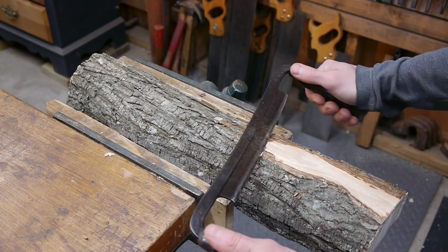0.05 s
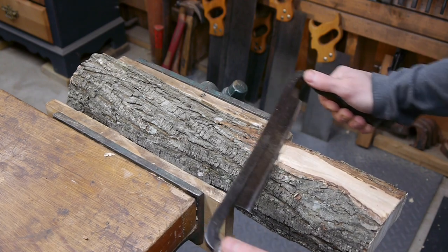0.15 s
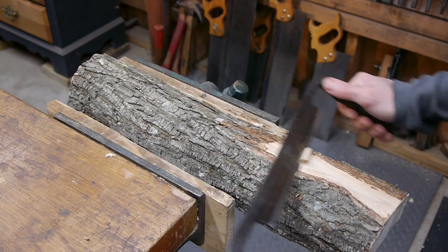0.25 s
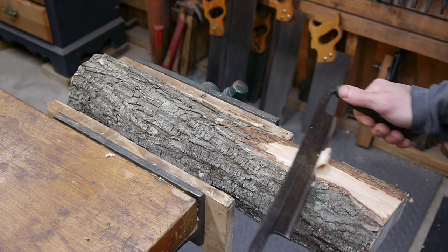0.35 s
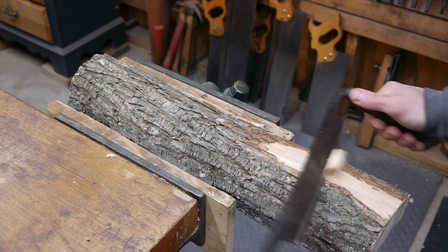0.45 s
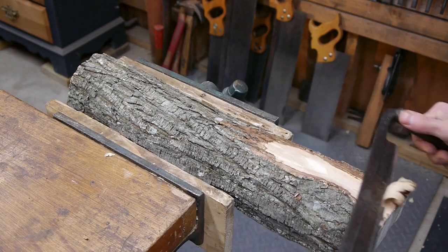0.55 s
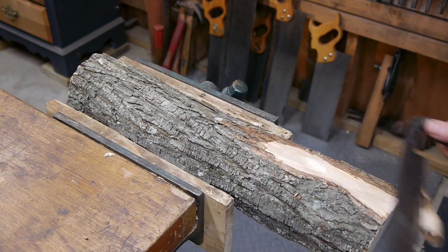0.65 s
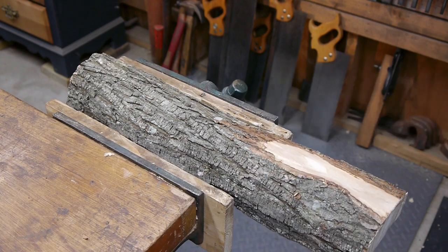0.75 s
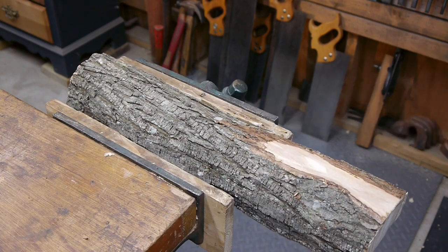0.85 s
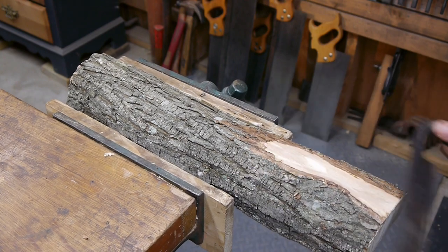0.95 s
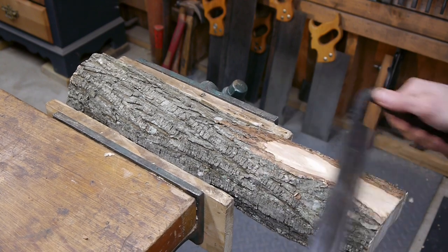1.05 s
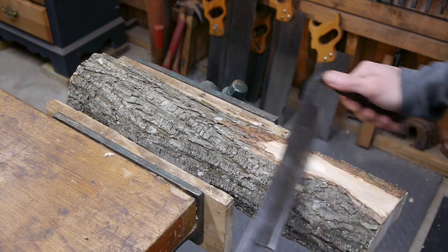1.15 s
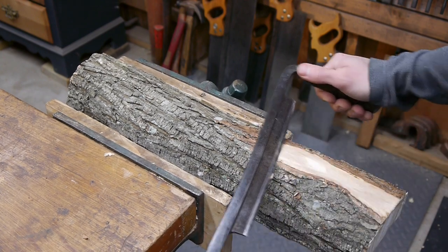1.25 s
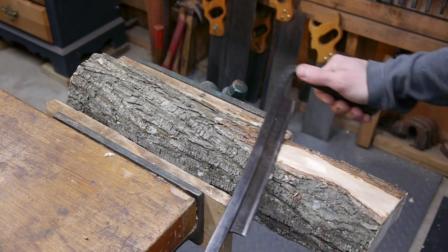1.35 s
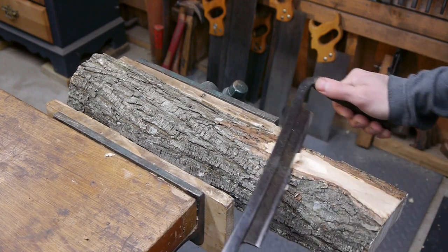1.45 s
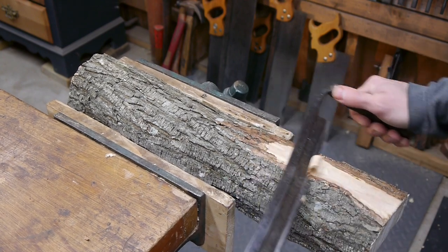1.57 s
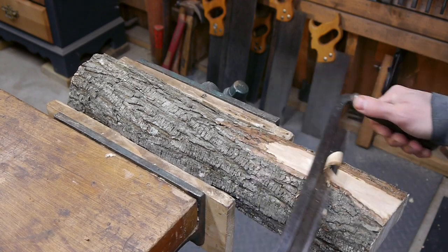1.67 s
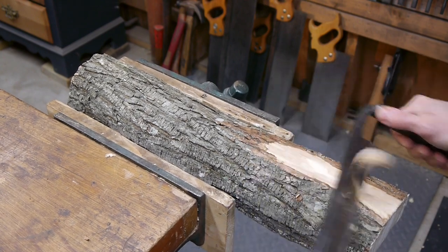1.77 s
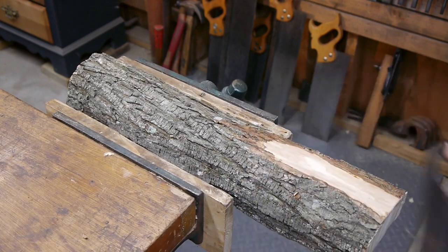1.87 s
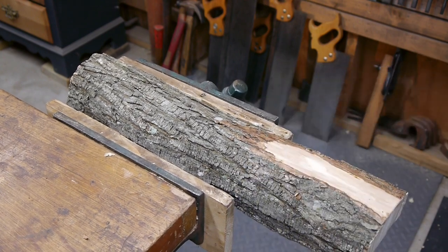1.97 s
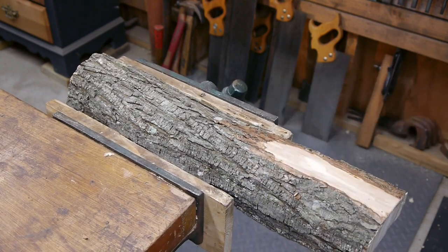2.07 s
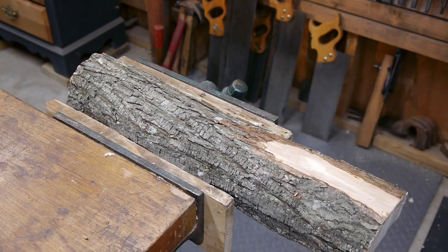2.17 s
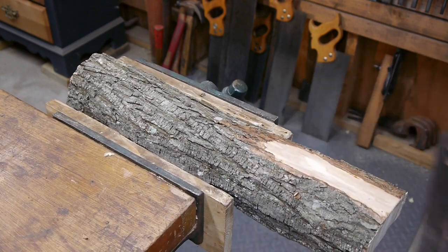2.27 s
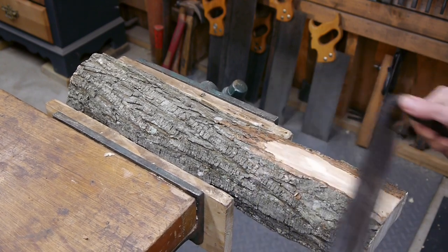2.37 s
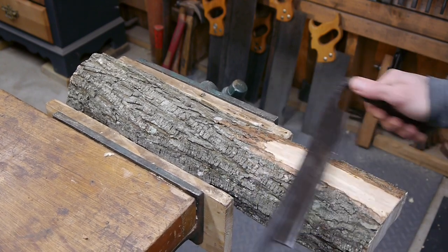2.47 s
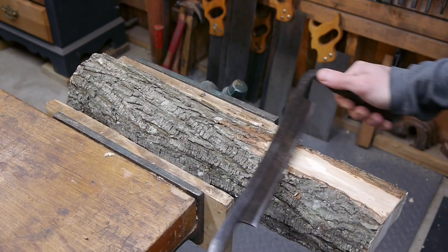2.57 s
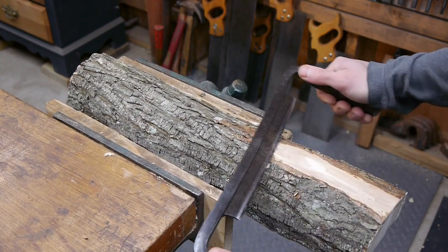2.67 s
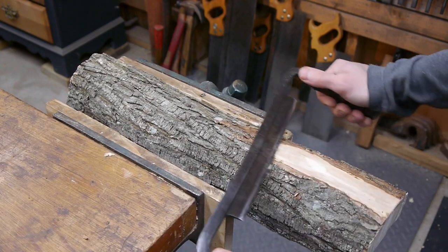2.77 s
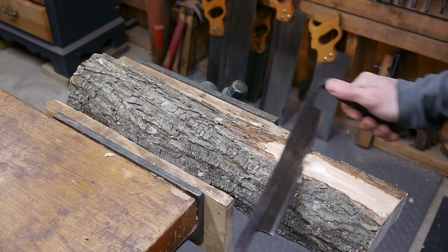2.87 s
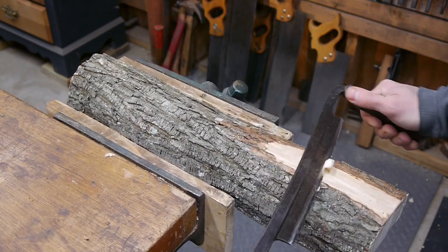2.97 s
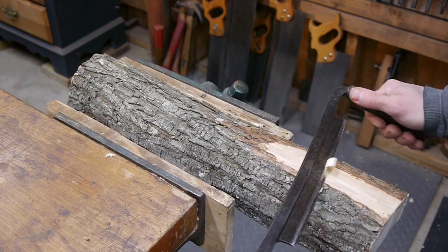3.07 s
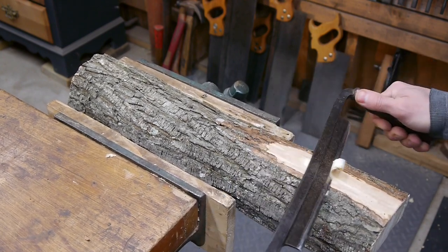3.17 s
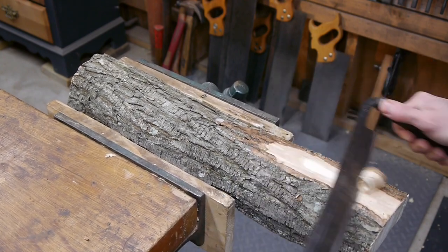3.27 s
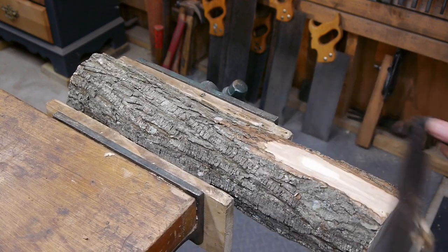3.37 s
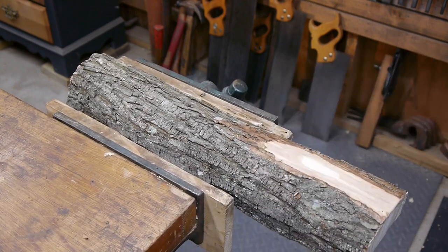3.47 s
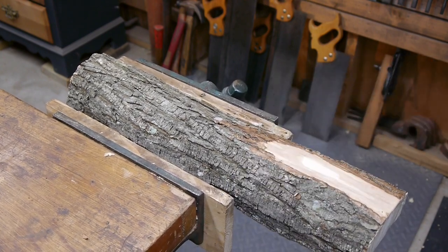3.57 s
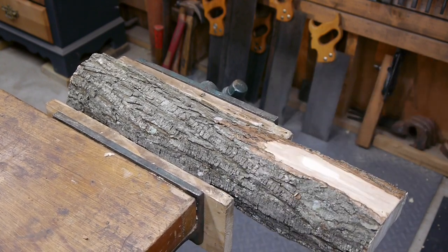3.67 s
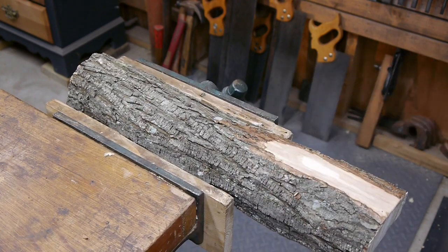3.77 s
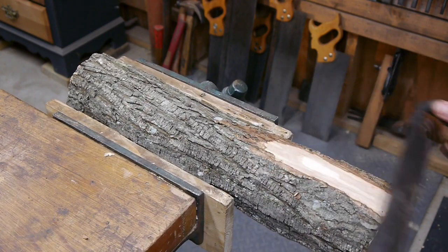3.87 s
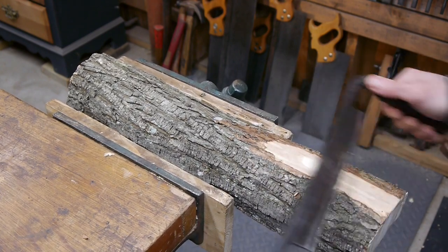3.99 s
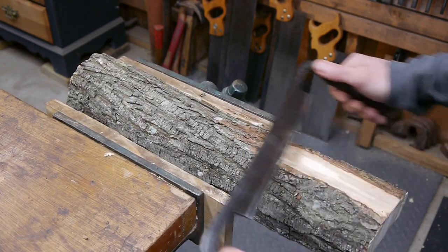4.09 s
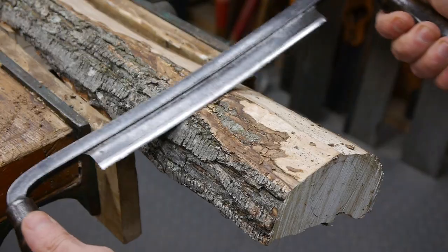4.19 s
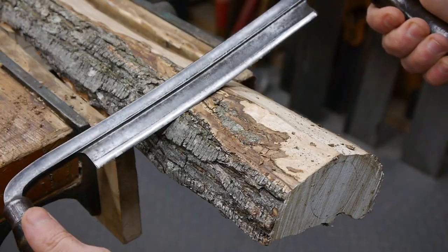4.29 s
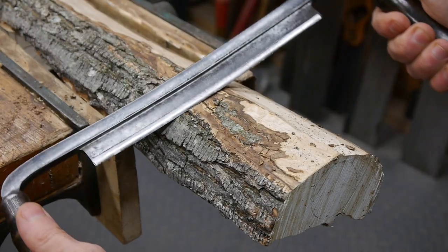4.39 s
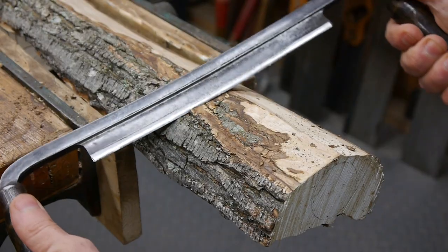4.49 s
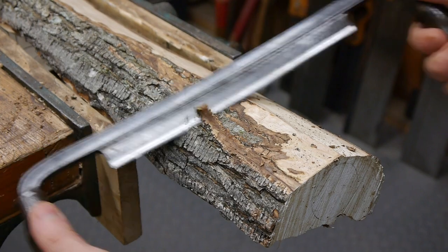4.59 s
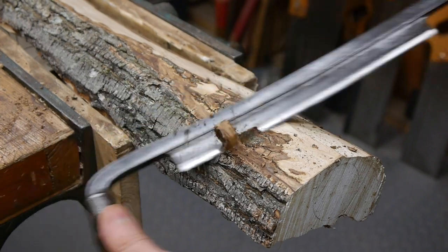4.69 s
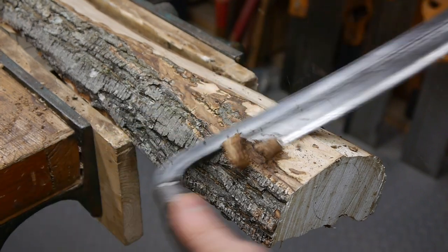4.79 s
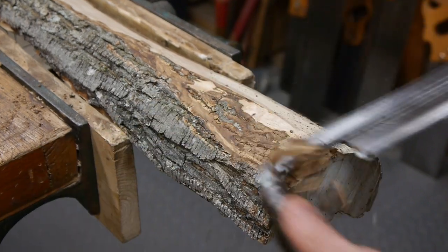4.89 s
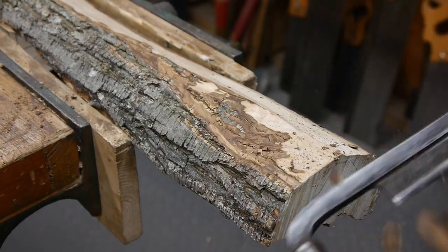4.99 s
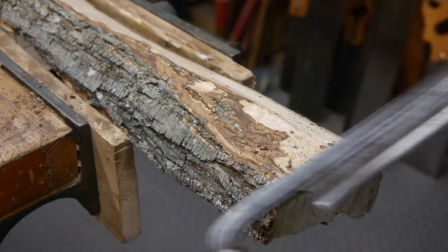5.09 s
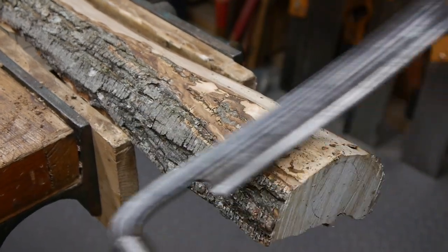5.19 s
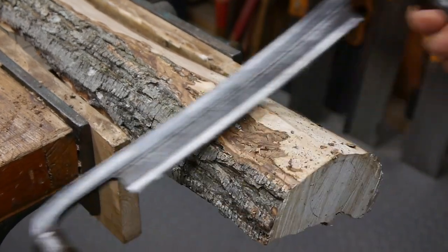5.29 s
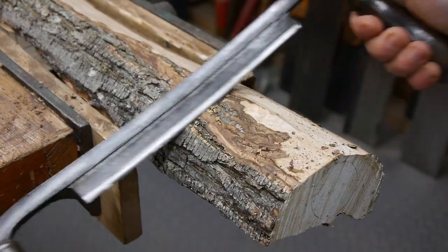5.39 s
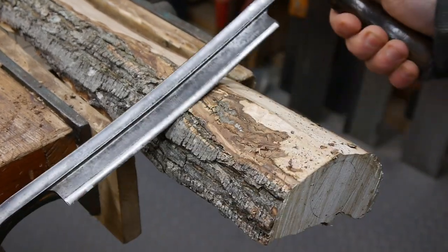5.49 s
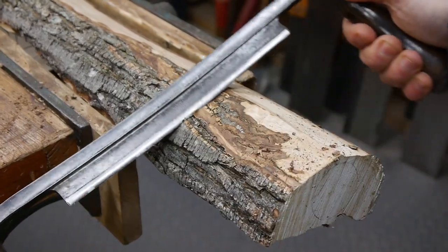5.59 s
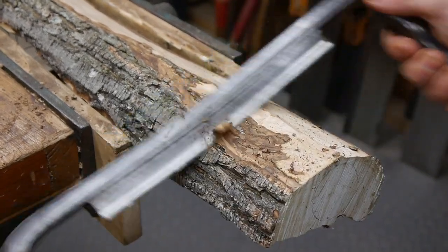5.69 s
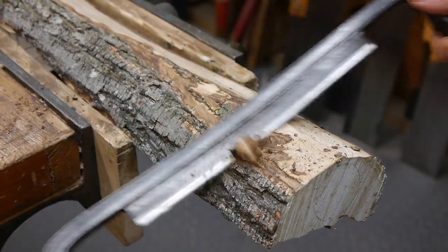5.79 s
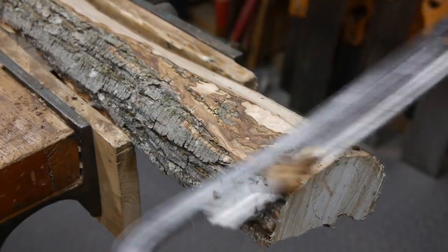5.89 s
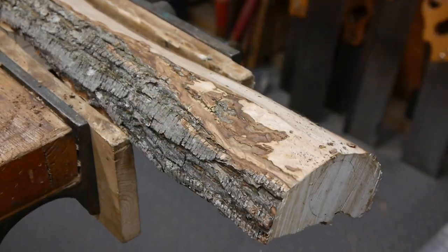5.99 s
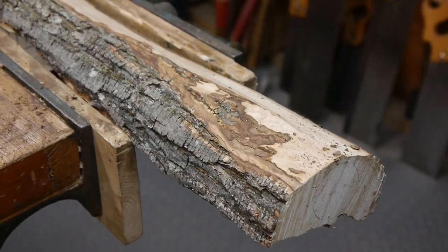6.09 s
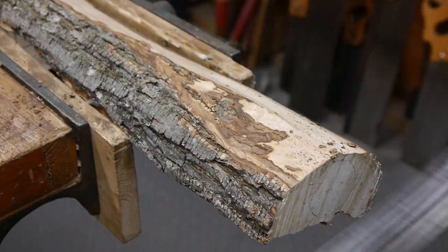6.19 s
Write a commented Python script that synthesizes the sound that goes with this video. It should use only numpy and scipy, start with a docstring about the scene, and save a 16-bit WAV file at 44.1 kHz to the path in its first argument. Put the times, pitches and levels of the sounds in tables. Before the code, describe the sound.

Close stereo sound in a small workshop with short reverberation and soft steady hiss. At 0.1 s a blade knocks hollowly on a log, and from 0.25 to 0.8 s it skims with a faint judder, then rasps, crackling and snapping, ending in a knock and ticking chips. A shaving lands at 1.2 s. A knock at 1.35 leads to a second scrape, 1.5-2.0, ending in a firm thud; shavings drop at 2.3. After bumps at 2.75 and 3.1, the third pull builds from 2.9 to 3.6 with chattering, crisp cracks and knocks. Another shaving falls at 3.85. A bright clack at 4.35 precedes a short, loud, tearing pull at 4.7-4.95, ending in a sharp crack, heavy knock and scattered chips. The blade slides back faintly at 5.2, knocks hardest at 5.5, then rips again from 5.7 to 6.0, rasping strongly and dying away with a knock and small ticks.

```python
"""Drawknife on a barked log

A drawknife peels bark from a log in a bench vice, in a small workshop: five pulls.
The last two pulls are in a second setup, with other log and blade resonances.
Knocks and clacks are ringing log modes and noise bursts; each pull skims, bites and runs out.
Random fibre breaks drive the cut through log and blade resonances; chatter, chips and snaps sit on top.
Shavings drop between pulls and soft brushing marks arm moves, all over a short room answer and steady hiss."""
import sys
import numpy as np
from scipy import signal
from scipy.fft import rfft, irfft, next_fast_len
from scipy.io import wavfile
from scipy.ndimage import uniform_filter1d, map_coordinates

SR = 44100
rng = np.random.default_rng(int(sys.argv[2]) if len(sys.argv) > 2 else 0)


def log_audio(samples):
    """Write samples as a 16-bit WAV file to the path given in sys.argv[1]."""
    # one column per channel
    frames = np.atleast_2d(samples).T
    # limit to full scale, then quantise
    limited = np.clip(frames, -1, 1)
    pcm = np.round(limited * 32767).astype(np.int16)
    wavfile.write(sys.argv[1], SR, pcm)


N = 275625


def amp(db):
    """Amplitude ratio of a level in dB."""
    return 10 ** (np.asarray(db) / 20)


def unit(x):
    """x scaled to rms 1."""
    return x / np.sqrt(np.mean(x ** 2) + 1e-20)


def along(points, hz):
    """Interpolate (Hz, value) points on a log frequency axis."""
    f, v = np.transpose(points)
    return np.interp(np.log(hz + 1), np.log(f + 1), v)


def wobble(rate_hz):
    """A smooth random curve, rate_hz knots a second."""
    knots = rng.standard_normal(int(N * rate_hz / SR) + 4)
    return map_coordinates(knots, [np.arange(N) * rate_hz / SR])


def coloured(x, gain):
    """x through the causal minimum-phase filter with this gain of frequency."""
    n = x.shape[-1]
    m = 2 * next_fast_len(n // 2 + 4096)
    log_gain = np.log(np.maximum(gain(np.fft.rfftfreq(m, 1 / SR)), 1e-6))
    cepstrum = irfft(log_gain, m)
    cepstrum[1:m // 2] *= 2  # fold onto positive time
    cepstrum[m // 2 + 1:] = 0
    return irfft(rfft(x, m) * np.exp(rfft(cepstrum)), m)[..., :n]


def shaped(x, spectrum):
    """x filtered by a (Hz, dB) spectrum, at rms 1."""
    return unit(coloured(x, lambda hz: amp(along(spectrum, hz))))


def add(track, s, sound, db):
    """Mix a sound into the track at a peak level."""
    part = track[round(s * SR):][:len(sound)]
    part += amp(db) * sound[:len(part)] / np.abs(sound).max()


def burst(t60_s):
    """A puff of tiny contacts: noise decaying 60 dB in t60_s."""
    t = np.arange(SR // 3) / SR
    return rng.standard_normal(len(t)) * amp(-60 * t / t60_s)


def fractures(rate_hz, spread_db):
    """Randomly timed breaks of uneven size and random sign, at rms 1."""
    size = amp(spread_db * np.clip(rng.standard_normal(N), -2, 2)) * rng.choice([-1, 1], N)
    return unit(size * (rng.random(N) < rate_hz / SR))


def swell(start_s, length_s, rise, fade, drift=0):
    """A gain that rises up to start_s, drifts for length_s, then fades; rates in dB per second."""
    t = np.arange(N) / SR - start_s
    rising_db = rise * np.minimum(t, 0)
    drift_db = drift * np.clip(t, 0, length_s)
    fading_db = fade * np.maximum(t - length_s, 0)
    return amp(rising_db + drift_db - fading_db)


def placed(x, wet_db):
    """Split a source into direct and reverberant shares of constant total power."""
    return np.array([x, amp(wet_db) * x]) / np.hypot(1, amp(wet_db))


# Room tone spectrum. Each row: frequency in Hz, level in dB.
TONE_SPECTRUM = [(12, -21), (20, -2.5), (145, -2.5), (253, 6.5), (344, -2), (553, 1.5), (691, -0.5),
                 (966, -7), (1050, -6.5), (3490, -15), (5010, -8), (7200, -11.5), (9250, -8.5),
                 (15700, -31.5)]
# Unshared part of the room tone. Each row: frequency in Hz, gain in dB.
TONE_SIDE = [(60, -7), (110, -6), (200, -19), (380, -9), (700, -6.5), (1290, 3.5), (2380, 0.5), (4400, -2),
             (8120, -6.5), (15000, 7)]


def room_tone(mid_db):
    """Steady air and microphone hiss: a shared part, plus a part of opposite sign in the two channels."""
    mid, side = (shaped(rng.standard_normal(N), TONE_SPECTRUM) for part in range(2))
    side = coloured(side, lambda hz: amp(along(TONE_SIDE, hz)))
    return amp(mid_db) * np.array([mid + side, mid - side])


# Blade bumps on the log. Each row: start in seconds, peak in dB, favoured frequency in Hz, bark crunch
# peak in dB, hardness 0-1, rebound gap in seconds, first rebound in dB relative to the knock.
KNOCKS = [(0.098, -21.5, 447, -25, 0.5, 0.019, 0), (0.77, -23.5, 383, -25.5, 0.8, 0.016, -3),
          (0.938, -35.5, 680, -49.5, 0.4, 0.026, -17), (1.357, -26, 453, -29.5, 0.84, 0.025, 3),
          (1.984, -18.5, 285, -22, 1, 0.033, -17), (2.757, -23, 467, -29.5, 0.85, 0.026, -0.5),
          (3.097, -30.5, 550, -24, 0.02, 0.025, -3), (3.503, -19.5, 360, -28, 0.6, .028, -14),
          (3.606, -26, 320, -28, 0.5, .028, -13), (4.002, -46, 266, -65, .35, 0.023, -14),
          (4.243, -33, 350, -64, 0.31, 0.032, -0.5), (4.349, -34, 305, -27.5, 0.6, .012, -17),
          (4.950, -10.5, 347, -30, .1, .038, -4), (5.184, -35, 494, -35, 0.4, 0.026, -16),
          (5.350, -34, 508, -38, 0.65, 0.029, -16), (5.447, -24.5, 520, -31, 1, 0.029, -3),
          (5.504, -6.5, 392, -21, 0.25, 0.033, -11), (5.967, -12.5, 402, -39, 0.06, .028, -11),
          (6.186, -25.5, 335, -35, 0.9, .028, -17)]
# Modes of the log in its vice. Each row: frequency in Hz, level in dB, t60 in seconds.
LOG_MODES = [(85, 0.5, 0.11), (148.5, -9.5, 0.32), (232.5, -6.5, 0.18), (249.3, -6.5, 0.27),
             (305.3, -4.5, 0.11), (361.5, -3, 0.074), (385.8, -1, 0.092), (428, -1, 0.082),
             (468, -3, 0.069), (515, -6.5, 0.12), (557.5, -7.5, 0.17), (790, 0, 0.039), (904, -17, 0.16),
             (1109, -17.5, 0.13), (1367, -16, 0.1)]
# Crushed bark spectrum. Each row: frequency in Hz, level in dB per Hz.
CRUNCH_SPECTRUM = [(25, -29), (60, -28), (200, 0.5), (600, 2.5), (1400, -3.5), (2200, -12), (3500, -30.5),
                   (7000, -21), (15000, -41)]
# Per rebound: further loss, pitch ratio, crunch change.
REBOUND_LOSS_DB, REBOUND_PITCH, REBOUND_CRUNCH_DB = 10, 0.94, -8.5


def knocks(count=3):
    """Where the blade lands decides which log modes ring most; bark crushes under it, and it rebounds twice."""
    out, t = np.zeros(N), np.arange(SR // 2) / SR
    hz, level_db, t60_s = np.transpose(LOG_MODES)[:, :, None]
    for s, db, favoured_hz, crunch_db, hardness, gap_s, rebound_db in KNOCKS:
        hardness = np.clip(hardness, .02, 1)
        for k in range(count):
            at_s = s + k * gap_s
            change_db = rebound_db - (k - 1) * REBOUND_LOSS_DB if k else 0
            pitch_offset = np.log(hz / (favoured_hz * REBOUND_PITCH ** k))
            weight = np.exp(-(pitch_offset / 0.18) ** 2) + .5 * hardness
            decay = amp(level_db + rng.normal(0, 1.3, hz.shape) - 60 * t / t60_s)
            phase = rng.normal(0, 0.64, hz.shape)
            modes = weight * decay * np.sin(2 * np.pi * hz * t + phase)
            ring = modes.sum(0) * (1 - np.exp(-t * hardness / 0.0012))  # harder contact, faster attack
            # a log radiates little deep bass
            radiated = coloured(ring, lambda f: f ** 2 / (f ** 2 + 150 ** 2))
            add(out, at_s, radiated, db + change_db)
            crunch = shaped(burst(t60_s=0.13), CRUNCH_SPECTRUM)
            add(out, at_s, crunch, crunch_db + change_db + k * REBOUND_CRUNCH_DB)
    return out


# Steel on hard bark. Each row: start in seconds, peak in dB, grating in dB relative to the hit.
CLACKS = [(0.098, -25.5, -26), (3.097, -26.5, -3), (4.348, -10.5, -18), (5.499, -20, -30)]
# Clack spectrum. Each row: frequency in Hz, level in dB per Hz.
CLACK_SPECTRUM = [(100, -24), (300, -4), (500, -1), (1100, -4), (1500, -9), (2100, -1), (3000, 0),
                  (4300, 0), (5500, -3), (8500, -13), (11000, -22), (15500, -40)]


def clack():
    """The steel edge hits a hard ridge of bark and grates on it for a moment."""
    out = np.zeros(N)
    for s, db, grating_db in CLACKS:
        contact = burst(t60_s=0.012) + amp(grating_db) * burst(t60_s=0.039)
        add(out, s, shaped(contact, CLACK_SPECTRUM), db)
    return out


# Left-right likeness of the room. Each row: frequency in Hz, correlation from -1 to 1.
LIKENESS = [(25, 1), (60, 0.98), (130, .999), (330, 1), (450, 0.99), (600, 0.98), (800, 0.86), (1300, 0.61),
            (2200, 0.47), (5000, 0.8), (9000, 0.65), (13000, -0.69)]


def diffuse(pair):
    """Two unrelated signals become a sound field at the two close microphones."""
    n = pair.shape[-1]
    turn = np.arccos(np.clip(along(LIKENESS, np.fft.rfftfreq(n, 1 / SR)), -1, 1)) / 2
    mid, side = irfft(rfft(pair) * [np.cos(turn), np.sin(turn)], n)
    return np.array([mid + side, mid - side])


# Room decay. Each row: frequency in Hz, t60 in seconds.
ROOM_T60 = [(100, 0.36), (400, 0.35), (1500, 0.33), (5000, 0.28), (10000, 0.17), (15000, 0.12)]


def workshop(x, count=26):
    """The small workshop's short, diffuse answer: overlapping decaying noise tails, freshly drawn, crossfaded."""
    out, hop, length = np.zeros((2, N + 2 * SR)), N // count, SR // 3
    for start in range(0, N + hop, hop):
        hz, t, z = signal.stft(rng.standard_normal((2, length)), SR, nperseg=256)
        decay = amp(-60 * t / along(ROOM_T60, hz)[:, None])
        tail = diffuse(signal.istft(z * decay, SR, nperseg=256)[1])
        tail = tail / np.linalg.norm(tail) * np.sqrt(2)
        span = np.arange(max(start - hop, 0), min(start + hop, N))
        part = x[span] * np.cos(np.pi / 2 * (span - start) / hop)
        wet = signal.fftconvolve(part[None], tail, axes=1)
        out[:, span[0] + round(.005 * SR):][:, :wet.shape[1]] += wet  # 5 ms pre-delay
    return out[:, :N]


# Strokes; the quiet one from 5.167 s slides the blade back up the log. Each row: start in seconds, skim
# length in seconds, skim in dB, pressure growth in dB per second, hiss in dB over the skim, run-out in dB,
# run-out fade in dB per second, rasp slope in dB per octave, tearing slope in dB per octave.
STROKES = [(0.251, 0.53, -42, -5.5, -4, -33.5, 118, 2, -2.5),
           (1.5, 0.49, -45, 26, -3.5, -26.5, 132, .2, -0.2),
           (2.924, 0.56, -49.5, 33.5, 0, -29, 93, 2, -0.1), (4.678, 0.28, -35.5, 32, -5, -21, 175, 0.1, 4),
           (5.167, 0.24, -49, -10, -19, -51, 120, -2.5, -3),
           (5.677, 0.29, -47.5, 64, -7, -26, 75, -0.06, 1.5)]
# The edge bites and lifts a shaving. Each row: start in seconds, length in seconds, log shudder in dB,
# blade rasp in dB, fibre tearing in dB.
BITES = [(0.504, 0.03, -35.5, -35, -66), (0.571, 0.045, -37.5, -31, -29), (1.679, 0.075, -27.5, -33.5, -34),
         (1.824, 0.025, -26.5, -36.5, -37.5), (1.872, 0.037, -30.5, -36.5, -30),
         (3.333, 0.11, -29, -29, -29), (3.59, 0.03, -32.5, -55, -49.5), (4.711, 0.03, -31, -29, -29),
         (4.754, 0.057, -22, -23, -22), (4.874, 0.052, -22.5, -27.5, -24),
         (5.742, 0.028, -32.5, -28.5, -32.5), (5.789, 0.061, -27.5, -19, -30),
         (5.92, 0.053, -25, -20.5, -26.5), (6.087, 0.032, -45, -36, -40)]
# Bite rise in dB per second for shudder, rasp, tearing: fibres give way last and most suddenly.
BITE_RISE_DB_PER_S = [350, 356, 520]
BITE_SAG_DB_PER_S, BITE_FADE_DB_PER_S = 31, 316
SKIM_RISE_DB_PER_S, SKIM_FADE_DB_PER_S = 313, 402
SKIM_RASP_DB, HISS_GROWTH = -1.5, 0.11  # rasp over shudder; share of pressure growth the hiss follows
RUNOUT_RISE_DB_PER_S, RUNOUT_HOLD_S = 1200, 0.0056
RUNOUT_RASP_DB, RUNOUT_HISS_DB = -6, -20.5  # over shudder; dull, few fibres still tear


def stroke(start_s, length_s, skim_db, growth, hiss_db, runout_db, runout_fade):
    """Gains of shudder, rasp and tearing: a skim under changing pressure, its bites, and the dull run-out."""
    def skim(drift):
        return swell(start_s, length_s, SKIM_RISE_DB_PER_S, SKIM_FADE_DB_PER_S, drift)

    pressed = skim(growth)
    hiss = amp(hiss_db) * skim(HISS_GROWTH * growth)
    parts = [amp(skim_db) * np.array([pressed, amp(SKIM_RASP_DB) * pressed, hiss])]
    runout = amp(runout_db) * swell(start_s + length_s, RUNOUT_HOLD_S, RUNOUT_RISE_DB_PER_S, runout_fade)
    parts.append(np.array([runout, amp(RUNOUT_RASP_DB) * runout, amp(RUNOUT_HISS_DB) * runout]))
    for s, hold_s, *levels_db in BITES:
        if start_s <= s < start_s + length_s + .2:
            bite = [amp(db) * swell(s, hold_s, rise, BITE_FADE_DB_PER_S, -BITE_SAG_DB_PER_S)
                    for db, rise in zip(levels_db, BITE_RISE_DB_PER_S)]
            parts.append(np.array(bite))
    return np.sqrt(sum(part ** 2 for part in parts))


def fluttering(x, patchy_db):
    """The resonances come and go as the cut travels along the edge and the shaving curls."""
    z = signal.stft(x, nperseg=256)[2]
    field = uniform_filter1d(rng.standard_normal(z.shape), size=6, axis=0)
    field = uniform_filter1d(field, size=7, axis=1)
    return unit(signal.istft(z * amp(patchy_db * unit(field)), nperseg=256)[1][:N])


def tilted(x, slope):
    """x with a spectral slope in dB per octave, at rms 1."""
    octaves = np.log2(np.fft.rfftfreq(N, 1 / SR) + 1)
    return unit(irfft(rfft(x) * amp(slope * octaves), N))


# Cut spectra in the first and second setup. Each row: frequency in Hz, level in dB per Hz.
FIRST_SPECTRUM = [(30, -46), (60, -27), (90, -2.5), (120, -24), (165, 1.5), (250, 0.5), (370, -3),
                  (700, -2.5), (950, -5), (1400, -19), (3200, -30), (8500, -20), (11000, -23), (15500, -39)]
SECOND_SPECTRUM = [(30, -43), (60, -25), (88, -5.5), (110, -15.5), (160, 1.5), (250, 2.5), (700, -7.5),
                   (1500, -16.5), (3200, -27.5), (6500, -26), (10000, -22.5), (12000, -27.5),
                   (15500, -40.5)]
# Resonances of blade and log under the cut. Each row: frequency in Hz, width in Hz, dB above the spectrum.
FIRST_PEAKS = [(242.2, 33, 9), (830, 150, 4), (1333, 80, 5), (1550, 150, 5), (1850, 92, 11), (2000, 85, 14),
               (2430, 170, 6.5), (2780, 83, 4), (3415, 33, 7), (4150, 190, 7), (5170, 120, 1),
               (5960, 170, -2), (6670, 200, 2)]
SECOND_PEAKS = [(154, 15.6, 9.2), (224, 61, 7.8), (394, 48, 8.8), (559, 46, 7.2), (790, 79, 7.4),
                (912, 53, 4.1), (1131, 26, 10.8), (1332, 85, 8.3), (2130, 44, 4.2), (2434, 110, 13.3),
                (2770, 80, 3.1), (5130, 170, 2.5), (10100, 270, 1.4)]
SECOND_FROM_S = 4.2
SPLINTERS_DB = -6.5  # single loud breaks against the fine tearing


def pull(cuts, spectrum, peaks, split_hz, bright_hz, catch_db, crackle_db):
    """The edge catches and frees: big breaks shake the log, finer ones rasp the blade and crackle the shaving."""
    def body(hz):
        peaks_db = sum(db / (1 + (2 * (hz - f) / width) ** 2) for f, width, db in peaks)
        return amp(along(spectrum, hz) + peaks_db)

    def below(hz, edge_hz):
        return 1 / np.sqrt(1 + (hz / edge_hz) ** 10)

    def above(hz, edge_hz):
        return np.sqrt(1 - below(hz, edge_hz) ** 2)

    catch = catch_db * wobble(70)
    coarse = unit(fractures(rate_hz=600, spread_db=1) * amp(catch))
    fine = unit(fractures(rate_hz=7000, spread_db=2) * amp(catch + 0.67 * wobble(350)))
    log = unit(coloured(coarse, lambda hz: body(hz) * below(hz, split_hz)))
    blade = coloured(coarse + 0.92 * fine, lambda hz: body(hz) * above(hz, split_hz) * below(hz, bright_hz))
    blade = fluttering(blade, patchy_db=3.0)
    splinters = amp(crackle_db) * fractures(rate_hz=110, spread_db=-3.0)
    shaving = coloured(fine + splinters, lambda hz: body(hz) * above(hz, bright_hz))
    shaving = fluttering(shaving, patchy_db=2.5)
    out = np.zeros(N)
    for *motion, rasp_slope, tear_slope in cuts:
        shudder, rasp, tear = stroke(*motion)
        out += shudder * log + rasp * tilted(blade, rasp_slope) + tear * tilted(shaving, tear_slope)
    return out


# Blade chatter. Each row: start in seconds, length in seconds, pitch in Hz, pitch scatter in Hz, rms in dB.
CHATTER = [(0.255, 0.175, 820, 110, -40.5), (3.338, 0.09, 793, 83, -25.5), (5.775, 0.073, 730, 49.68, -32),
           (5.935, 0.054, 870, 46, -31.5), (3.602, 0.02, 2816, 120, -48.5), (5.011, 0.044, 5190, 75, -42.5)]


def chatter():
    """The edge sticks and slips at an unsteady rate: a low judder in the cut, a squeak as it slides off."""
    out = np.zeros(N)
    for start_s, length_s, pitch_hz, scatter_hz, db in CHATTER:
        n = round(length_s * SR)
        drift = map_coordinates(rng.standard_normal(200), [np.arange(n) * 280 / SR], mode="mirror")
        catch = map_coordinates(rng.standard_normal(200), [np.arange(n) * 130 / SR], mode="mirror")
        phase = 2 * np.pi * np.cumsum(pitch_hz + scatter_hz * drift) / SR
        tone = amp(3.4 * catch) * np.sin(phase)
        out[round(start_s * SR):][:n] += amp(db) * unit(tone * signal.windows.tukey(n, .25))
    return out


# Loose chips rattling off the blade. Each row: start in seconds, peak in dB, t60 in seconds.
CHIPS = [(0.508, -34, 0.14), (0.821, -30, 0.095), (1.976, -25.5, 0.15), (3.496, -29.5, 0.17),
         (3.597, -32, 0.1), (4.985, -26, 0.12), (5.018, -23.5, 0.057), (6.236, -30.5, 0.12)]
# Chip spectrum. Each row: frequency in Hz, level in dB per Hz.
CHIP_SPECTRUM = [(300, -37), (800, -11), (1300, 11), (2000, 9), (3200, 6), (4500, 1), (15000, -39)]


def chips():
    """Loose flakes tick against the steel in quick, dying succession."""
    out, t = np.zeros(N), np.arange(SR // 4) / SR
    for s, db, t60_s in CHIPS:
        ticks = rng.standard_normal(len(t)) * (rng.random(len(t)) < 700 / SR)
        add(out, s, shaped(ticks * amp(-60 * t / t60_s), CHIP_SPECTRUM), db)
    return out


# Cracking splinters and stiff shavings. Each row: start in seconds, peak in dB, centre in Hz, t60 in seconds.
SNAPS = [(0.565, -15, 6300, 0.061), (0.712, -18, 7500, 0.054), (1.196, -33, 11500, 0.036),
         (1.682, -17, 8900, 0.047), (1.762, -22, 10000, .012), (1.875, -18, 9200, 0.025),
         (1.912, -17, 8000, .02), (2.298, -20, 8600, 0.013), (2.878, -28, 8200, 0.096),
         (3.058, -29, 8600, 0.034), (3.339, -16.5, 8940, 0.072), (3.455, -11, 7300, 0.041),
         (4.313, -33.5, 7600, 0.14), (4.706, -12, 10900, 0.0074), (4.753, -10, 11000, 0.025),
         (4.815, -10, 10200, .003), (4.883, -11, 10500, .003), (4.948, -0.5, 10600, 0.0055),
         (4.952, -8.5, 9400, 0.022), (5.055, -26, 9700, 0.004), (5.447, -24.5, 7400, 0.029),
         (5.699, -27, 10100, 0.0069), (5.728, -20, 9900, 0.0091), (5.966, -13, 9200, .015),
         (6.217, -31, 9800, 0.0055)]


def snaps():
    """Splinters give way in short bright cracks: noise in a band over a weaker, broader one."""
    out = np.zeros(N)
    for s, db, centre_hz, t60_s in SNAPS:
        def band(hz):
            narrow = np.exp(-(np.log((hz + 1) / centre_hz) / 0.33) ** 2)
            return narrow + 0.27 * np.exp(-np.log((hz + 1) / 5000) ** 2)

        add(out, s, coloured(burst(t60_s), band), db)
    return out


# Shavings landing. Each row: start in seconds, peak in dB.
FALLS = [(1.190, -25.5), (2.291, -27.5), (2.297, -22), (3.851, -23.5)]
# Landing spectrum. Each row: frequency in Hz, level in dB per Hz.
FALL_SPECTRUM = [(59, -48), (100, -25), (214, -7.5), (276, -10.5), (532, -9), (617, -5), (1410, -12),
                 (1530, -18), (1780, -9), (2390, -20), (4060, -14), (8880, 0.5), (15700, -22.5)]


def falls():
    """Stiff shavings touch down on the floor: soft-edged bursts of noise."""
    out, t = np.zeros(N), np.arange(SR // 3) / SR
    for s, db in FALLS:
        landing = burst(t60_s=0.044) * (1 - np.exp(-t / 0.013))
        add(out, s, shaped(landing, FALL_SPECTRUM), db)
    return out


# Light brushing as the arms move back. Each row: start in seconds, length in seconds, level in dB.
BRUSHES = [(2.438, 0.086, -53), (4.006, 0.029, -52.5), (4.138, 0.018, -58), (4.255, 0.024, -54.5),
           (4.514, 0.031, -49.5), (5.358, 0.022, -49.5), (5.474, 0.11, -46)]
# Brushing spectrum. Each row: frequency in Hz, level in dB per Hz.
CLOTH_SPECTRUM = [(59, -69), (100, -7.5), (233, -1), (294, -21), (364, -1), (567, -10), (658, -28),
                  (983, -3.5), (1210, -19.5), (9460, -8.5), (15700, -24)]
BRUSH_RISE_DB_PER_S, BRUSH_FADE_DB_PER_S = 402, 137


def brushing():
    """A soft, grainy brush swells and fades with each move of the arms."""
    level = sum(amp(db) * swell(s, length_s, BRUSH_RISE_DB_PER_S, BRUSH_FADE_DB_PER_S)
                for s, length_s, db in BRUSHES)
    return level * shaped(fractures(rate_hz=5400, spread_db=7.0), CLOTH_SPECTRUM)


# The room answers more weakly in the bass. Each row: frequency in Hz, gain in dB.
ECHO = [(200, -3), (450, -2), (800, -0.5)]


def scene():
    """Work at the log is near; the floor under the bench is farther and wetter."""
    first_cuts = [row for row in STROKES if row[0] < SECOND_FROM_S]
    second_cuts = [row for row in STROKES if row[0] >= SECOND_FROM_S]
    first = pull(first_cuts, FIRST_SPECTRUM, FIRST_PEAKS, split_hz=503, bright_hz=2960,
                 catch_db=2.5, crackle_db=SPLINTERS_DB)
    second = pull(second_cuts, SECOND_SPECTRUM, SECOND_PEAKS, split_hz=468, bright_hz=3660,
                  catch_db=2.0, crackle_db=SPLINTERS_DB)
    cutting = placed(amp(-0.67) * (first + second) + chips(), wet_db=-4)
    cutting = cutting + placed(chatter(), wet_db=-8.5) + placed(snaps(), wet_db=-8.5)
    contacts = placed(knocks(), wet_db=-6.0) + placed(clack(), wet_db=1)
    direct, sent = cutting + contacts + placed(falls(), wet_db=3.0) + placed(brushing(), wet_db=-15)
    echo = workshop(coloured(sent, lambda hz: amp(along(ECHO, hz))))
    return direct + echo + room_tone(mid_db=-58)


# Microphone level mismatch. Each row: frequency in Hz, dB more in the left.
LEFT = [(450, 0), (750, 1), (1200, 2), (1600, 0), (12000, .3)]
# Microphone phase mismatch. Each row: frequency in Hz, left lag in radians.
LAG = [(9000, 0.021), (11500, 0.91), (13200, 1.4), (16000, 2.4)]
TOP_HZ = 15900


def record(dry):
    """Two slightly unlike microphones, out of step in the top treble; nothing passes above TOP_HZ."""
    m = next_fast_len(N + 8192)
    hz = np.fft.rfftfreq(m, 1 / SR)
    gains = amp(np.outer([.5, -.5], along(LEFT, hz)))
    phases = np.exp(1j * np.outer([-.5, .5], along(LAG, hz)))
    return irfft(rfft(np.clip(dry, -1, 1), m) * gains * phases * (hz < TOP_HZ), m)[:, :N]


dry = scene()
out = record(dry)
log_audio(out)
```